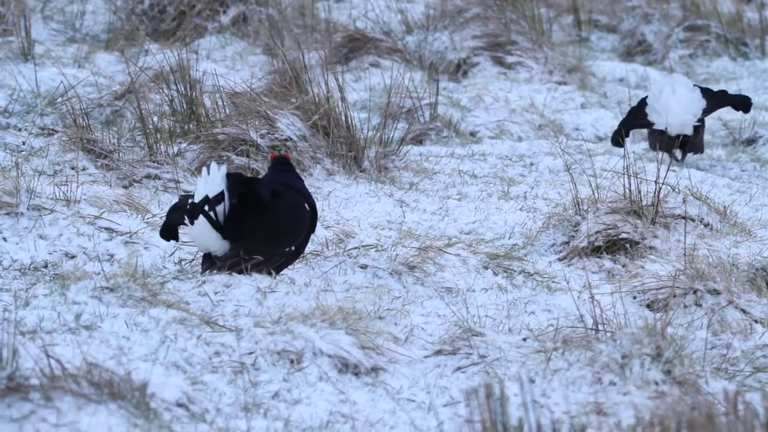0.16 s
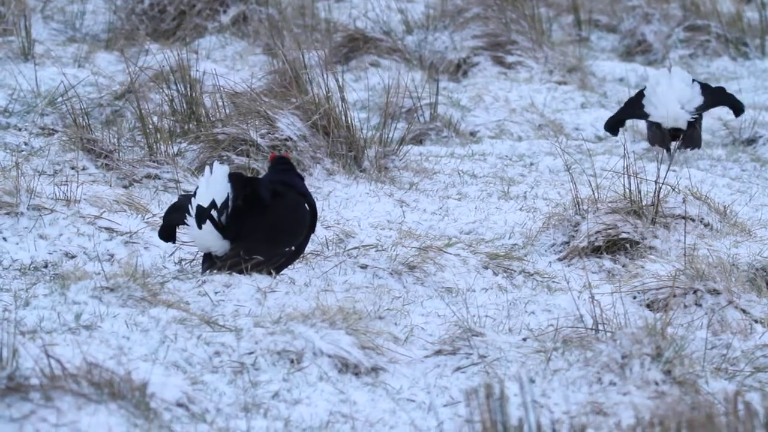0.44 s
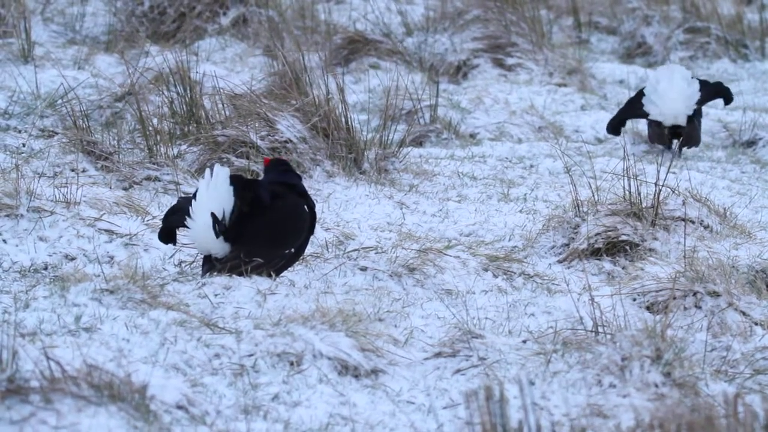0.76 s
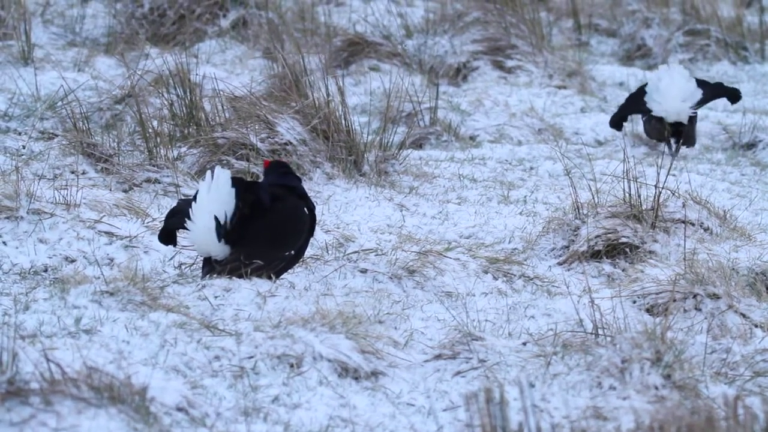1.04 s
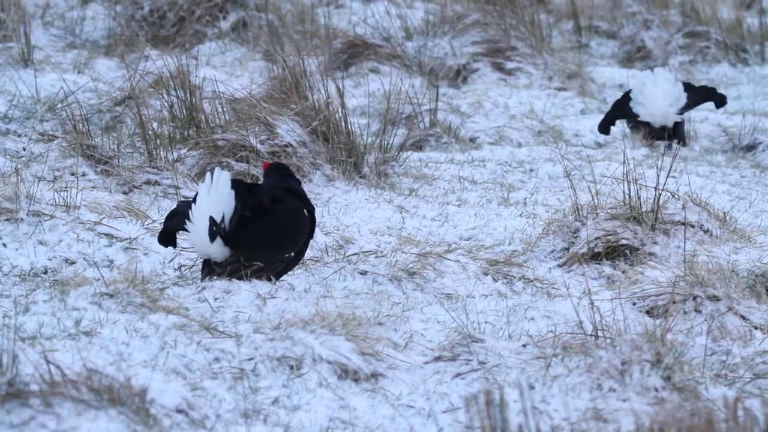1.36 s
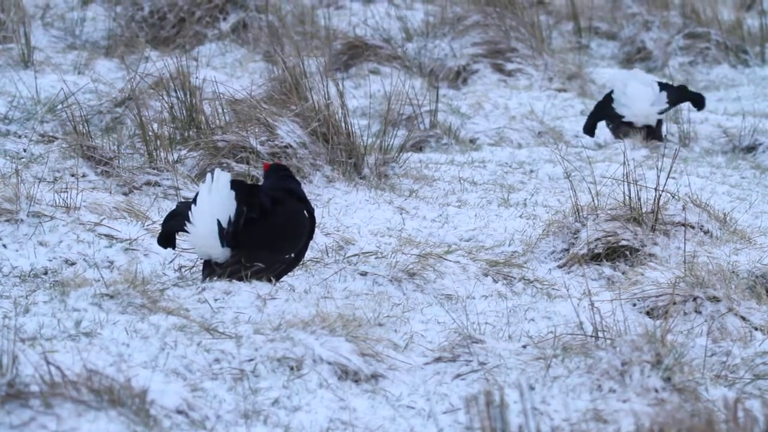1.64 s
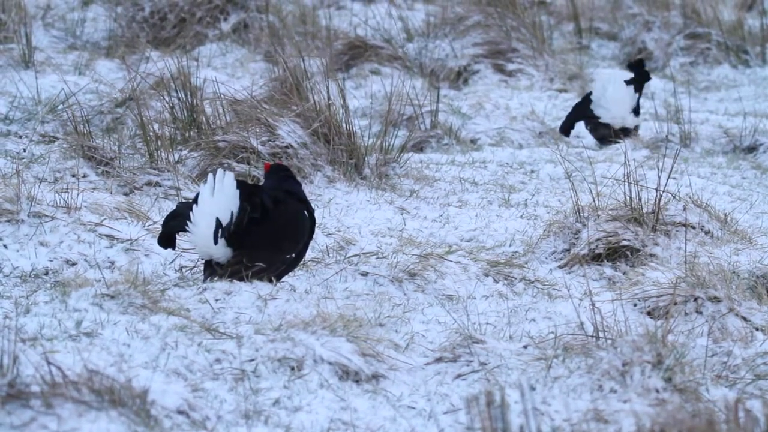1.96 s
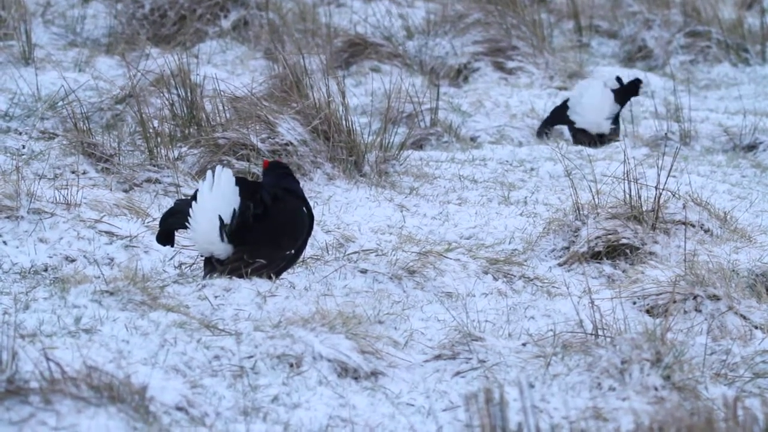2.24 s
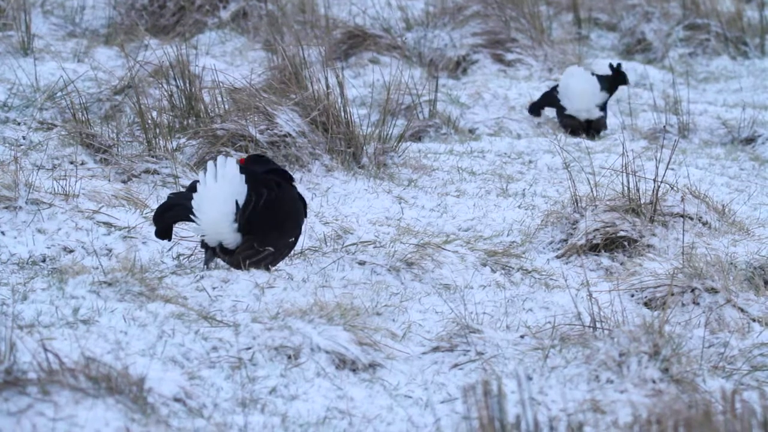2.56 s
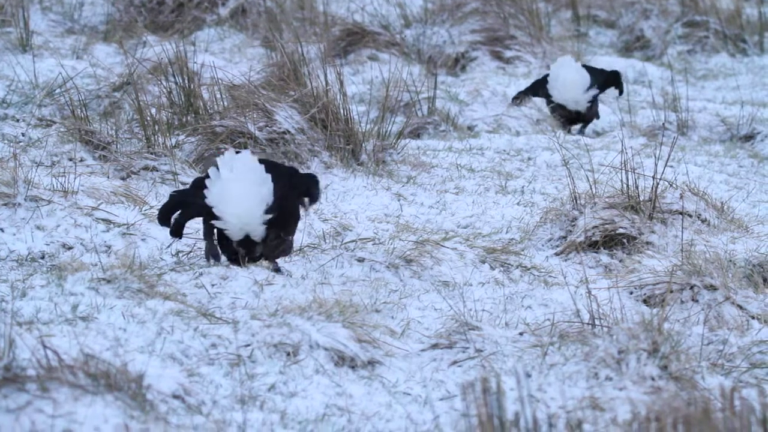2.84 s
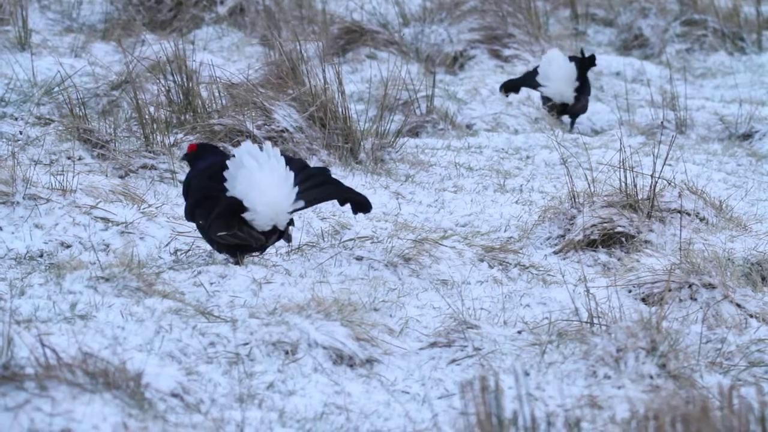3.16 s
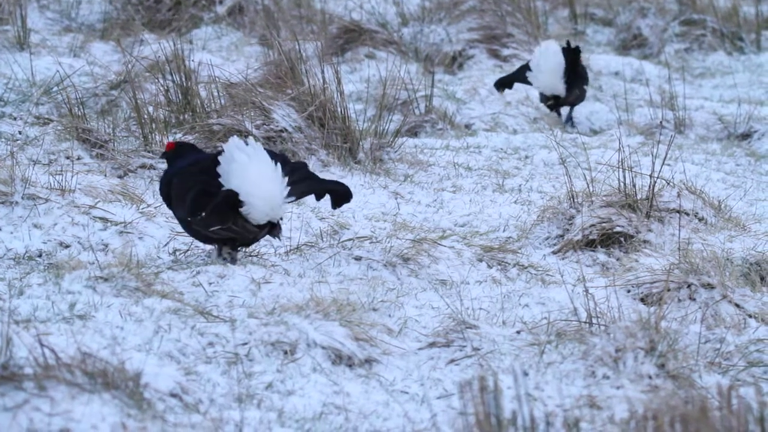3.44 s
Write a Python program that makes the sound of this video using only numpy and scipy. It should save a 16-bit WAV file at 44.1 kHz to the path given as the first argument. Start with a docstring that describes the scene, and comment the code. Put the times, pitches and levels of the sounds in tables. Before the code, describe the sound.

A grouse bubbles in a quick, low roll that swells over the first 1.2 seconds, then gives separate arching coos, loudest around 2.5 seconds. Feet tick and feathers rustle on crusted snow, mostly from 2.3 seconds on. A softer roll starts at 3 seconds, with another grouse cooing faintly further off. Distant wading birds whistle and warble throughout over a soft hiss, and light wind buffets the microphone near 3 seconds.

```python
"""Black grouse on a snowy moor

Out on open ground a displaying grouse gives two rolls of bubbling coos with arched coos between,
and another coos faintly further off. Feathers drag and feet tick on the crusted snow.
Far off, waders whistle, warble, yelp and chip, and all the calls echo faintly off the slopes.
Light wind buffets the microphone over a soft hiss of open air."""
import sys
import numpy as np
from scipy import signal
from scipy.fft import rfft, irfft
from scipy.io import wavfile

SR = 44100
rng = np.random.default_rng(int(sys.argv[2]) if len(sys.argv) > 2 else 0)


def digitize_waveform(pressure):
    """Quantize a signal to 16-bit integers and store it at the path in sys.argv[1].

    Rows of a 2-D input are taken as channels; values are limited to [-1, 1].
    """
    field = np.atleast_2d(pressure).T
    bounded = np.clip(field, -1, 1)
    quanta = np.round(bounded * 32767).astype(np.int16)
    wavfile.write(sys.argv[1], SR, quanta)


N = 159201


def amp(db):
    return 10 ** (np.asarray(db, float) / 20)


def unit_rms(x):
    return x / np.sqrt(np.mean(x ** 2) + 1e-20)


def colour(x, points):
    """Give x the spectrum of (Hz, dB) points, falling away outside them; rms 1."""
    hz, db = np.transpose(points)
    f = np.maximum(np.arange(N // 2 + 1) * SR / N, 1)
    skirts = np.minimum(f / hz[0], 1) ** 2 * np.minimum(hz[-1] / f, 1) ** 2
    gain = amp(np.interp(np.log(f), np.log(hz), db)) * skirts
    return unit_rms(irfft(rfft(x) * gain, N))


def drift(rate_hz):
    """A slow random wander; rms 1."""
    lowpass = signal.butter(2, rate_hz, fs=SR, output="sos")
    return unit_rms(signal.sosfilt(lowpass, rng.standard_normal(N + SR))[SR:])


def add(out, start, x):
    """Mix x into out at a time in seconds."""
    i = max(int(start * SR), 0)
    out[i:i + len(x)] += x[:max(N - i, 0)]


def sine(hz):
    return np.sin(2 * np.pi * np.cumsum(hz) / SR)


def fade(t, length, edge_s):
    return np.sin(np.pi / 2 * np.clip(np.minimum(t, length - t) / edge_s, 0, 1)) ** 2


# The air over the moor. Each row: frequency in Hz, relative level in dB.
AIR_SPECTRUM = [(288, -8), (422, 0), (605, -7.5), (1100, -13.5), (2900, -24.5), (11300, -31), (15900, -35)]


def open_air():
    """A steady hiss with a low hump, the blur of birds cooing further off."""
    return amp(-48) * colour(rng.standard_normal(N), AIR_SPECTRUM)


# Wind at the microphone. Each row: time in seconds, level in dB.
WIND_LEVELS = [(0, -52.5), (1.6, -55.5), (2.4, -49), (3.0, -43.5), (3.61, -48)]
# Its rumble. Each row: frequency in Hz, relative level in dB.
WIND_SPECTRUM = [(20, -1), (90, -2), (210, -5.5)]


def wind_rumble():
    """Light wind on the microphone makes low noise that swells and wavers."""
    times, levels = np.transpose(WIND_LEVELS)
    level_db = np.interp(np.arange(N) / SR, times, levels) + 2.56 * drift(rate_hz=6.2)
    return amp(level_db) * colour(rng.standard_normal(N), WIND_SPECTRUM)


# Buffets right on the microphone. Each row: start in seconds, level in dB.
BUFFETS = [(.725, -36.5), (2.933, -35.5), (2.974, -35), (3.319, -37)]


def wind_buffets(pitch_hz=69.3, rise_s=0.011):
    """Each buffet is a soft, low push of air that dies almost at once."""
    out, t = np.zeros(N), np.arange(SR // 10) / SR
    envelope = t / rise_s * np.exp(1 - t / rise_s)
    for start, db in BUFFETS:
        add(out, start, amp(db) * envelope * np.sin(2 * np.pi * pitch_hz * t))
    return out


# Returns off the ground and slopes. Each row: delay in seconds, gain in dB.
MOOR_ECHOES = [(0.02, -17), (.047, -27)]


def moor_echoes(calls):
    """The calls reach the microphone directly, then again as faint echoes."""
    out = calls.copy()
    for delay, db in MOOR_ECHOES:
        add(out, delay, amp(db) * calls)
    return out


# Whistles far across the moor. Each row: start and length in seconds, first and last pitch in Hz,
# level in dB.
WADER_WHISTLES = [(0.15, 0.49, 1420, 1667, -42), (0.432, 0.02, 2080, 2400, -33),
                  (0.645, 0.17, 2094, 2180, -53.5), (0.91, 0.042, 1622, 1648.0, -36.0),
                  (0.955, 0.071, 2210, 2290, -50.5), (0.99, 0.023, 2340, 2980, -47.5),
                  (1.335, 0.033, 1860, 1700, -40), (1.585, 0.013, 2560, 2760, -38.5),
                  (1.705, 0.017, 2450, 2900, -56), (1.84, 0.076, 1540, 1633, -29.5),
                  (1.92, 0.29, 2125, 2191, -46), (2.092, 0.042, 1830, 1970, -46.5),
                  (2.2, 0.365, 2170, 2001, -48.5), (2.578, 0.2, 1521, 1431, -39.5),
                  (2.868, 0.044, 1905, 1984, -41), (3.04, 0.15, 952.0, 925, -50.5),
                  (3.185, 0.02, 2554, 2975, -47.5), (3.28, 0.046, 1833, 1957, -42.5)]
# Distant runs of chips. Each row: middle of the first chip in seconds, pitch in Hz, chip levels in dB.
WADER_CHIPS = [(0.157, 1940, [-49, -50, -36, -39.5, -45]), (.656, 1917, [-44.5, -57, -47]),
               (3.485, 1734, [-47, -44])]
# Distant warbles. Each row: start and length in seconds, first and last pitch in Hz, level in dB,
# warbles per second, delay to the first crest in seconds.
WADER_WARBLES = [(0.015, 0.1, 1780, 1870, -30.5, 17.8, 0.028), (0.118, 0.31, 2460, 2340, -42, 18.6, 0.039),
                 (0.625, 0.28, 2373, 2390, -48.5, 18.25, 0.029), (1.03, 0.27, 1757, 1727, -36, 18, 0.045),
                 (1.19, 0.43, 2367, 2290, -52, 16.4, 0.017), (1.385, 0.081, 1606, 1874, -36, 12, 0.041),
                 (1.45, 0.25, 1892, 1840, -46.5, 23, 0.025), (1.795, 0.16, 1796, 2173, -45.5, 22, 0.034),
                 (1.9, 0.108, 1915, 1877, -45, 22.8, 0.032), (2.15, 0.16, 2583, 2480, -53, 20.4, 0.035),
                 (2.53, 0.28, 2545, 2490, -53.5, 20.7, 0.046),
                 (2.915, 0.26, 2530, 2470, -48.5, 17.5, 0.027),
                 (3.335, 0.29, 2520, 2440, -51.5, 18.3, 0.042)]
CHIP_S, CHIP_PERIOD_S, CHIP_FALL_HZ = 0.022, .0565, 219
SWING_HZ, SWING_DB, CALL_EDGE_S = 54.8, 3, 0.0065
HIGH_WARBLE_HZ, BREAK_FROM_S, TIRE_DB_PER_S = 2250, .13, 8


def waders():
    """Thin tones: straight glides, short falling chips, and warbles that soften as their pitch dips."""
    out = np.zeros(N)
    chips = [(first + k * CHIP_PERIOD_S - CHIP_S / 2, CHIP_S,
              hz + CHIP_FALL_HZ / 2, hz - CHIP_FALL_HZ / 2, db)
             for first, hz, levels in WADER_CHIPS for k, db in enumerate(levels)]
    glides = [(*row, 0, 0) for row in [*WADER_WHISTLES, *chips]]   # no warble
    for start, length, first_hz, last_hz, db, rate, crest in [*glides, *WADER_WARBLES]:
        t = np.arange(int((length + CALL_EDGE_S) * SR)) / SR
        phase = 2 * np.pi * rate * (t - crest)
        swing = np.cos(phase) * (rate > 0)
        pitch = first_hz + (last_hz - first_hz) * t / length + SWING_HZ * swing
        envelope = amp(db + SWING_DB * swing) * fade(t, length + CALL_EDGE_S, CALL_EDGE_S)
        if rate > 0 and first_hz > HIGH_WARBLE_HZ:   # the high warbler breaks into syllables as it tires
            gaps = np.clip(4 * np.cos(phase - 1.87) - 2.5, 0, 1) * (t > BREAK_FROM_S)
            envelope *= (1 - gaps) * amp(-TIRE_DB_PER_S * (t - length / 2))
        tone = sine(pitch) + amp(-30) * sine(2 * pitch)
        add(out, start - CALL_EDGE_S / 2, envelope * tone)
    return out * amp(2.5 * drift(rate_hz=19))


# Yelps from the distant waders. Each row: start in seconds, length in seconds, level in dB.
WADER_YELPS = [(.004, 0.013, -39.5), (.554, 0.061, -48), (1.122, 0.0665, -45)]


def wader_yelps(low_hz=1060, top_hz=1780, rise_s=.0125):
    """Each yelp, a tone with a strong octave, flicks up and arches over its top pitch."""
    out = np.zeros(N)
    for start, length, db in WADER_YELPS:
        t = np.arange(int(length * SR)) / SR
        flick = top_hz - (top_hz - low_hz) * np.exp(-(t / rise_s) ** 4)
        pitch = flick + SWING_HZ * np.sin(np.pi * t / length)
        tone = sine(pitch) + amp(-11) * sine(2 * pitch)
        add(out, start, amp(db) * fade(t, length, CALL_EDGE_S) * tone)
    return out


# Feathers on the snow. Each row: middle of the drag in seconds, length in seconds, level in dB.
FEATHER_DRAGS = [(1.42, 0.48, -57), (2.488, 0.59, -44), (3.14, 0.51, -50), (3.493, 0.56, -50)]
# Their rustle. Each row: frequency in Hz, relative level in dB.
FEATHER_SPECTRUM = [(700, 2), (3600, -9), (4900, -10.5), (5450, -4.5), (6000, -9.5), (7200, -14),
                    (11000, -14.5), (15900, -26)]


def feathers(grains_per_s=700):
    """Feathers scrape the crust: hiss and clumps of uneven grains swell and fade with each drag."""
    t = np.arange(N) / SR
    hits = rng.random(N) < grains_per_s * amp(6 * drift(rate_hz=14)) / SR
    sizes = amp(7.9 * np.minimum(rng.exponential(1, N), 2.8))
    grains = unit_rms(hits * sizes * rng.standard_normal(N))
    strokes = sum(amp(db) * fade(t - middle + length / 2, length, edge_s=length / 2)
                  for middle, length, db in FEATHER_DRAGS)
    flutter = amp(2.26 * drift(rate_hz=11))
    hiss = 1.28 * rng.standard_normal(N)
    return strokes * flutter * colour(grains + hiss, FEATHER_SPECTRUM)


# Feet on the display ground. Each row: start in seconds, level in dB, ring pitch in Hz.
FOOT_TICKS = [(1.4735, -44.5, 7100), (1.527, -47, 4430), (2.3104, -29.5, 4130), (2.314, -24.5, 1200),
              (2.4086, -22, 5400), (2.4956, -34.5, 13000), (2.5129, -27.5, 1300), (2.566, -29, 3780),
              (2.5839, -33, 10200), (2.6548, -38.5, 5100), (2.7395, -33, 10000), (3.198, -40, 10100),
              (3.412, -42, 11100), (3.451, -37, 12000), (3.4688, -33, 9800)]


def foot_ticks(rise_s=0.001, samples=500):
    """A foot on the snow crust gives a short noise burst that rings round its own pitch."""
    out, t = np.zeros(N), np.arange(samples) / SR
    for start, db, hz in FOOT_TICKS:
        burst = rng.standard_normal(samples) * t / rise_s * np.exp(1 - t / rise_s)
        band = signal.butter(2, [hz / 1.43, hz * 1.287], "band", fs=SR, output="sos")
        ring = signal.sosfilt(band, burst)
        tick = ring / np.abs(ring).max() + amp(-7) * burst / np.abs(burst).max()
        add(out, start, amp(db) * tick)
    return out


# The grouse's rolls, out on the snow. Each row: start in seconds, the level of each coo in dB.
COO_ROLLS = [(.054, [-40, -36, -34, -30.5, -30, -28.5, -33, -28, -32, -29, -28.5, -28, -27.5, -25, -21.5, -21]),
             (3.006, [-37, -38.5, -39, -36, -35, -34, -32.5, -30, -31])]
COO_PERIOD_S, COO_CREST_S, COO_ATTACK_S, COO_DECAY_S = .0702, 0.00743, 0.0096, 0.011
COO_HZ, COO_HZ_PER_DB, COO_REST_HZ, COO_FALL_S = 427.9, 5, 335, 0.028


def rolled_coos(lead_s=.02):
    """Quick pure coos bubble along, each falling towards a rest pitch; louder coos are higher."""
    out, t = np.zeros(N), np.arange(int(.09 * SR)) / SR - lead_s   # t = 0 at the coo's crest
    swell = np.exp(-(t / np.where(t < 0, COO_ATTACK_S, COO_DECAY_S)) ** 2)
    tail = amp(-13.5) * fade(t, length=0.055, edge_s=0.027)
    for start, levels in COO_ROLLS:
        for k, db in enumerate(levels):
            crest_s = start + k * COO_PERIOD_S + COO_CREST_S
            crest_hz = COO_HZ + COO_HZ_PER_DB * (db + 30.5)
            pitch = COO_REST_HZ + (crest_hz - COO_REST_HZ) * np.exp(-t / COO_FALL_S)
            add(out, crest_s - lead_s, amp(db) * (swell + tail) * sine(pitch))
    return out


# Arched coos of the near grouse, then fainter ones from a grouse further off. Each row: start and
# length in seconds, first, middle and last pitch in Hz, level in dB before the throat shapes it.
COO_ARCHES = [(1.16, 0.066, 536, 493, 402, -21), (1.229, 0.066, 530, 521, 353, -19.5),
              (1.289, 0.049, 580, 560, 430, -19), (1.368, 0.074, 422, 589, 506, -31.5),
              (1.624, 0.064, 513, 571, 410, -22), (1.748, 0.026, 600, 546, 354, -21.5),
              (1.854, 0.075, 387, 576, 385, -21.5), (1.939, 0.039, 400, 478, 544, -25),
              (1.973, 0.037, 474, 473, 580, -22), (2.019, 0.037, 410, 458, 594, -23),
              (2.05, 0.082, 492, 564, 620, -24.5), (2.127, 0.085, 646, 510, 457, -26),
              (2.273, 0.032, 576, 505, 466, -21), (2.299, 0.051, 412, 536, 423, -20.5),
              (2.359, 0.067, 354, 601.5, 342, -22.5), (2.455, 0.032, 626, 593, 580, -5),
              (2.534, 0.062, 494, 608, 468, -9.5), (2.605, 0.05, 390, 470, 630, -21.5),
              (2.649, 0.052, 463, 530, 630, -24), (2.702, 0.06, 632, 499, 458, -20),
              (2.928, 0.038, 598, 484, 335, -27.5), (3.091, 0.076, 520, 602, 513, -28),
              (3.185, 0.067, 516, 525, 500, -36.5), (3.377, 0.061, 562, 608, 497, -27.5),
              (3.451, 0.053, 540, 591, 510, -29), (3.512, 0.1, 568, 583.5, 529, -29.5)]
THROAT_HZ, THROAT_WIDTH_HZ, THROAT_DEPTH_DB = 482.6, 67.6, 13.5


def arched_coos():
    """Pure coos bend along a parabola, strongest near the pitch the inflated throat favours."""
    out = np.zeros(N)
    for start, length, first_hz, middle_hz, last_hz, db in COO_ARCHES:
        t = np.arange(int(length * SR)) / SR
        arch = np.polyfit([0, length / 2, length], [first_hz, middle_hz, last_hz], 2)
        pitch = np.polyval(arch, t)
        resonance = np.exp(-((pitch - THROAT_HZ) / THROAT_WIDTH_HZ) ** 2)
        throat = amp(-THROAT_DEPTH_DB * (1 - resonance))
        add(out, start, amp(db) * throat * fade(t, length, edge_s=0.013) * sine(pitch))
    return out


def grouse(uneven_db=2.0):
    """All the coos, rolled and arched, wavering in level."""
    return (rolled_coos() + arched_coos()) * amp(uneven_db * drift(rate_hz=33))


def scene():
    """The moor from one microphone; only the calls echo."""
    background = wind_rumble() + wind_buffets() + open_air()
    calls = moor_echoes(grouse() + waders() + wader_yelps())
    return (background + calls + foot_ticks() + feathers())[None]


def record(dry):
    """The recorder cuts the top treble steeply."""
    return signal.sosfilt(signal.cheby2(16, 80, 16500, fs=SR, output="sos"), dry)


dry = scene()
out = record(dry)
digitize_waveform(out)
```